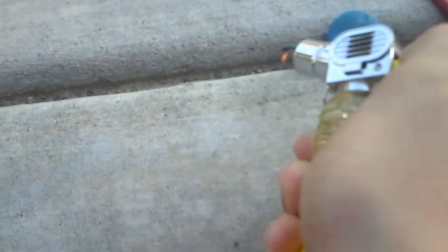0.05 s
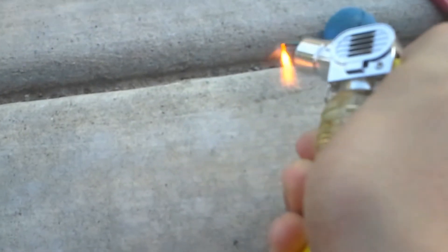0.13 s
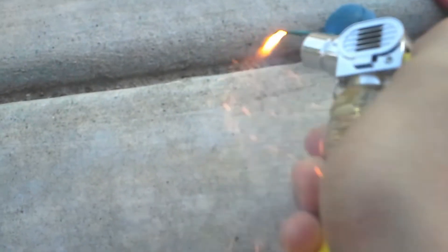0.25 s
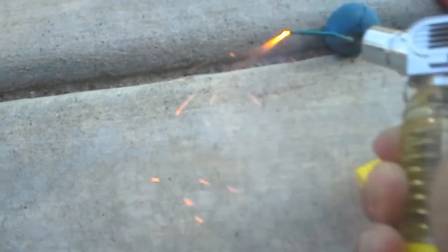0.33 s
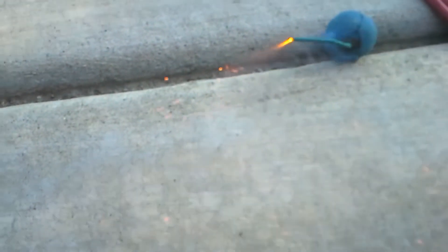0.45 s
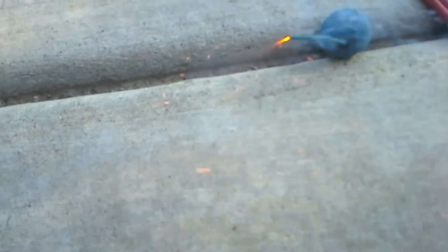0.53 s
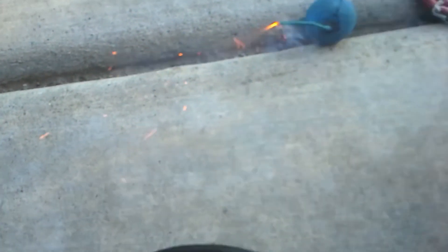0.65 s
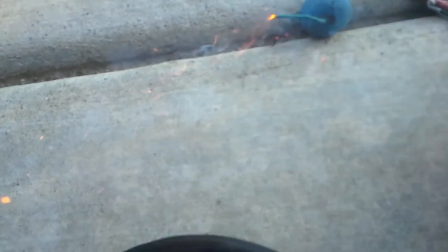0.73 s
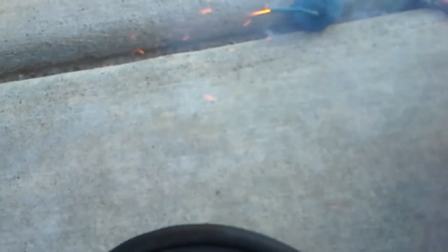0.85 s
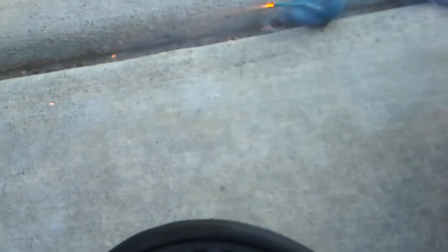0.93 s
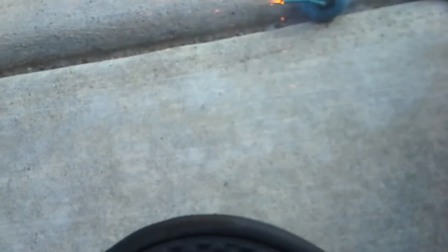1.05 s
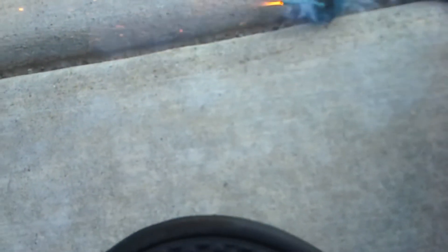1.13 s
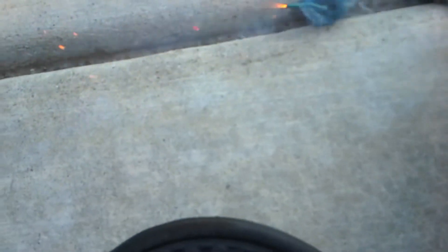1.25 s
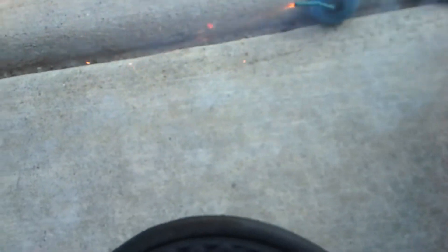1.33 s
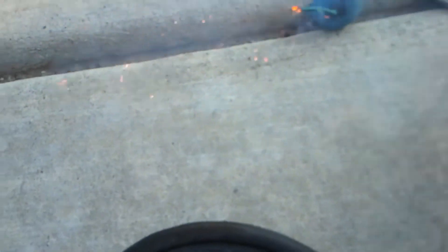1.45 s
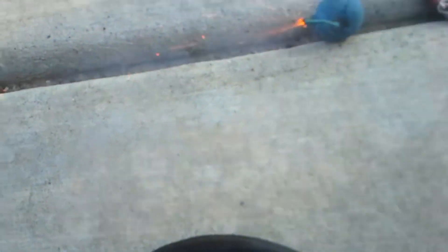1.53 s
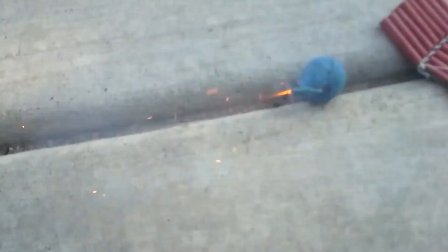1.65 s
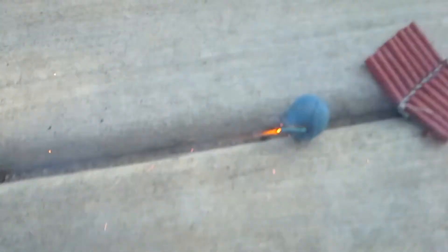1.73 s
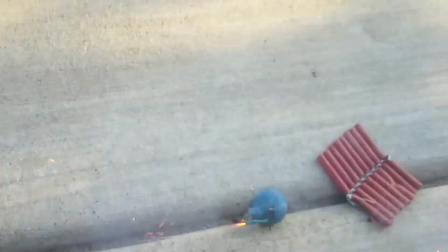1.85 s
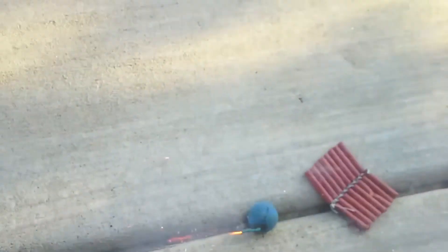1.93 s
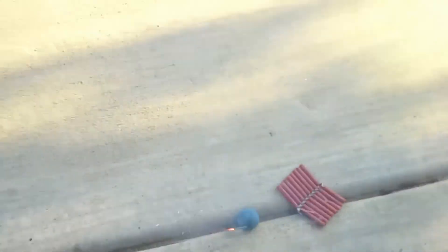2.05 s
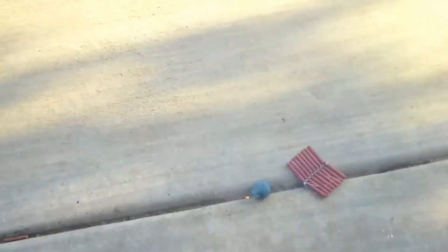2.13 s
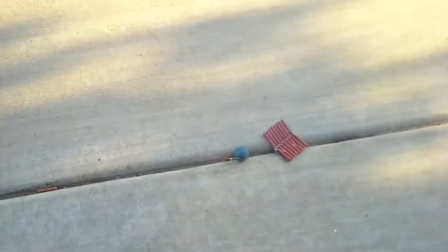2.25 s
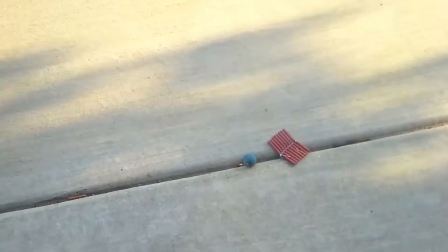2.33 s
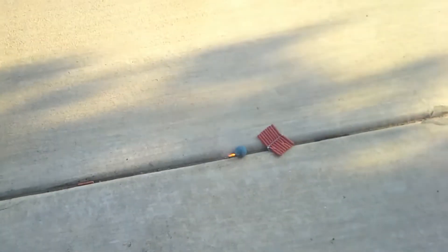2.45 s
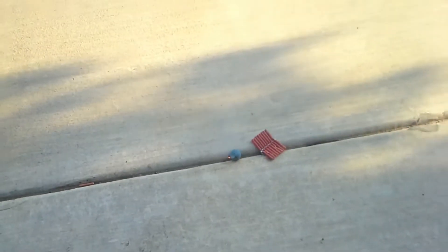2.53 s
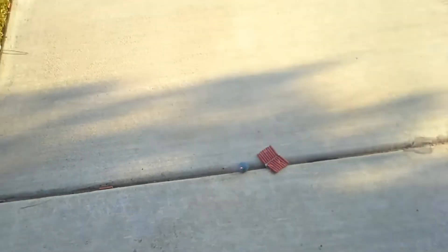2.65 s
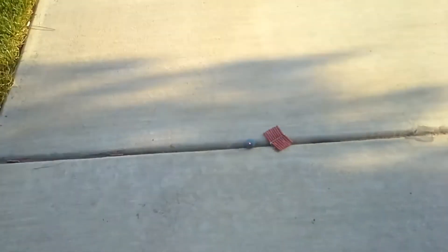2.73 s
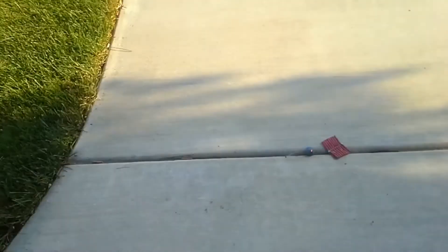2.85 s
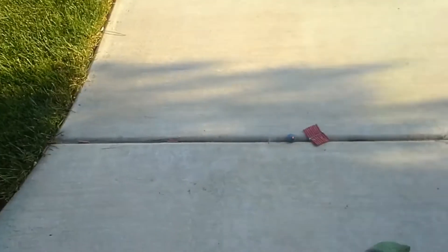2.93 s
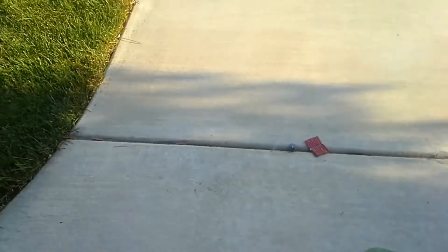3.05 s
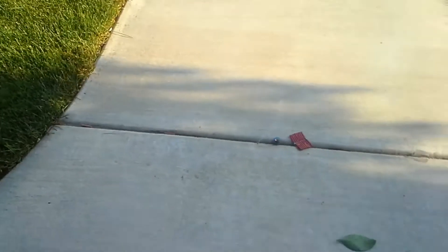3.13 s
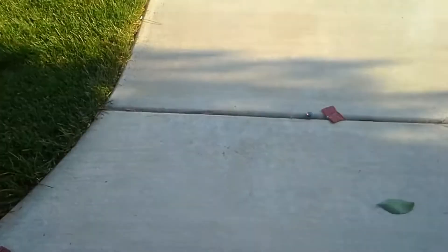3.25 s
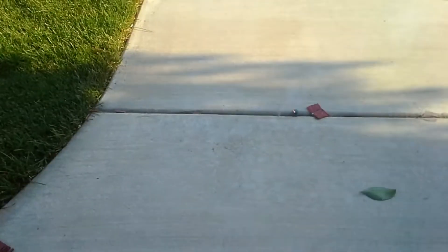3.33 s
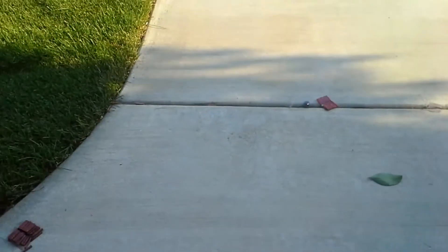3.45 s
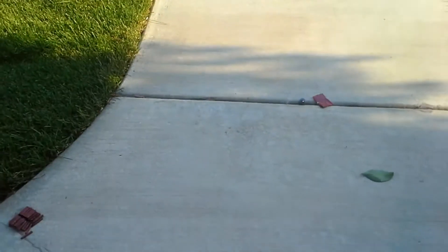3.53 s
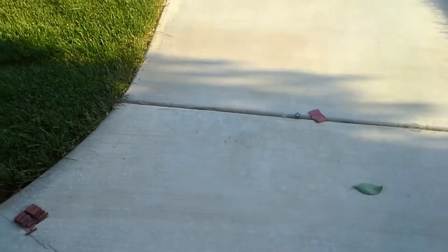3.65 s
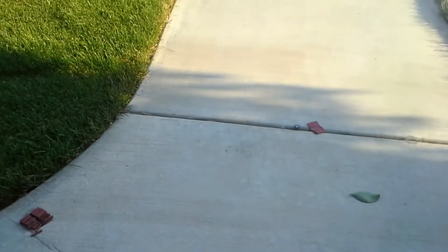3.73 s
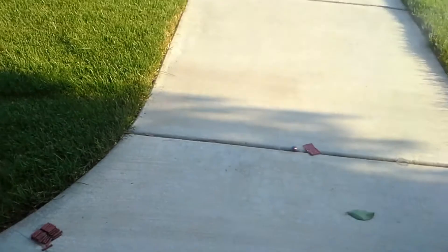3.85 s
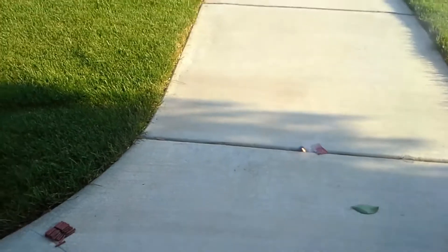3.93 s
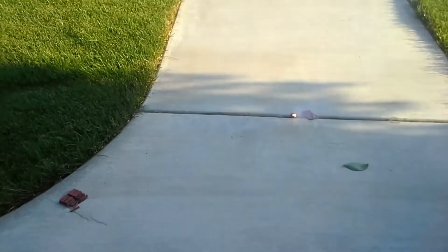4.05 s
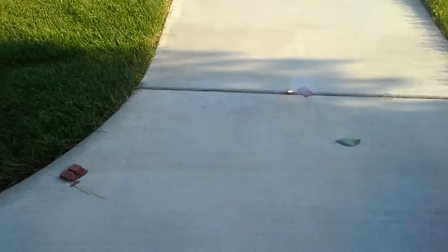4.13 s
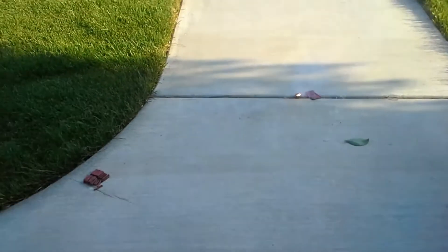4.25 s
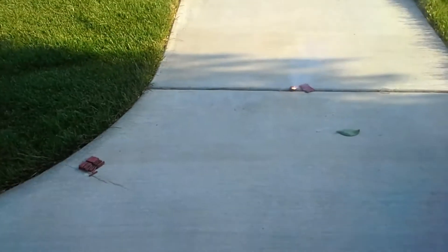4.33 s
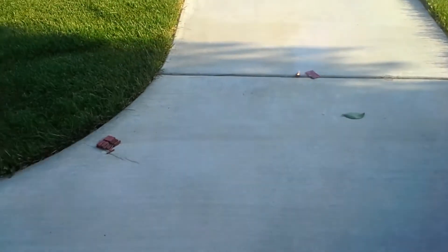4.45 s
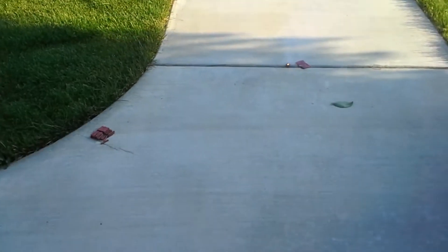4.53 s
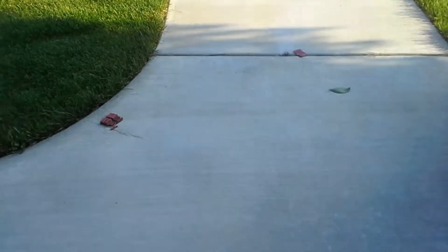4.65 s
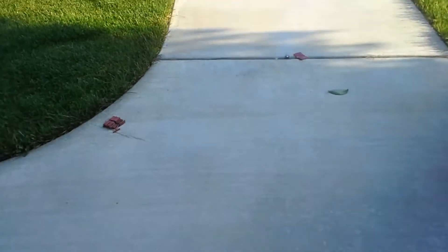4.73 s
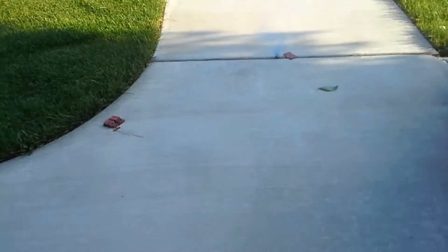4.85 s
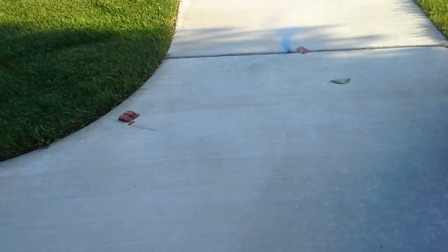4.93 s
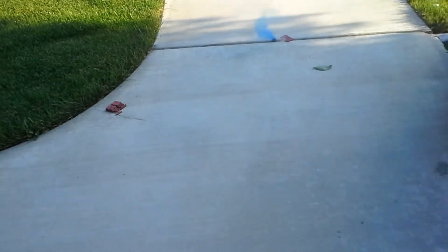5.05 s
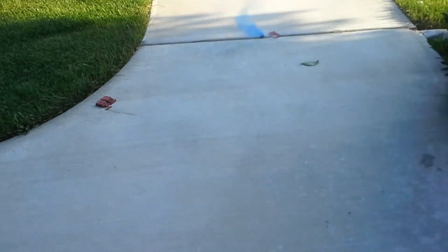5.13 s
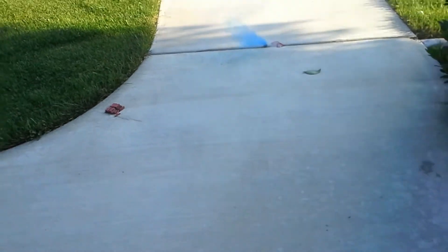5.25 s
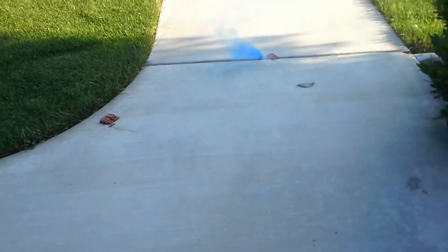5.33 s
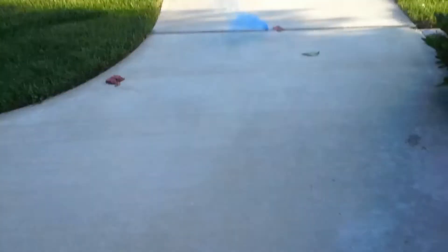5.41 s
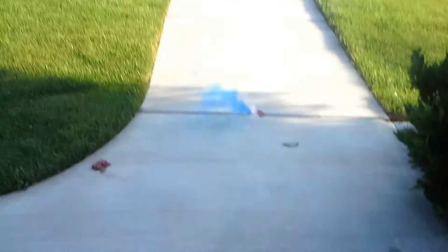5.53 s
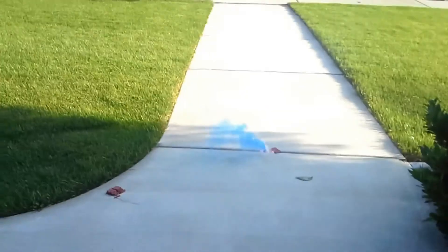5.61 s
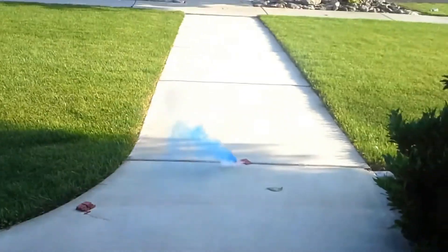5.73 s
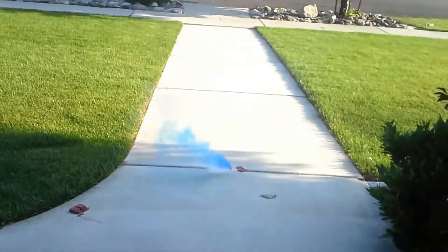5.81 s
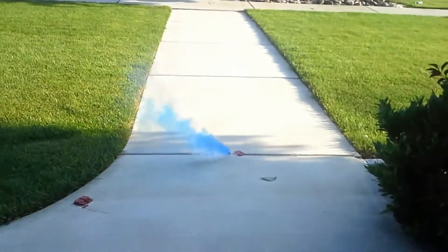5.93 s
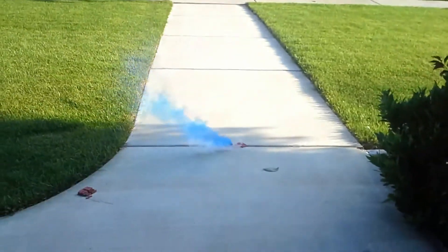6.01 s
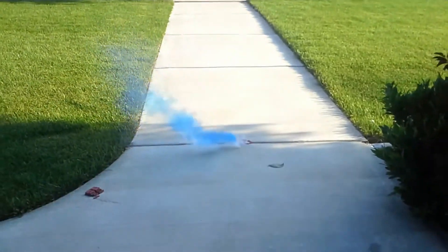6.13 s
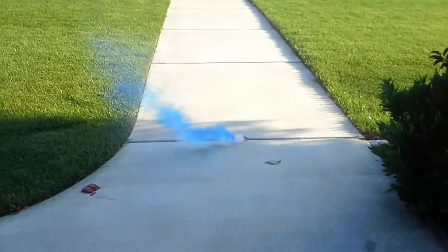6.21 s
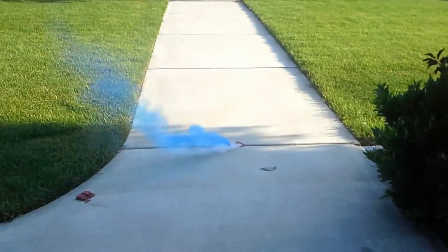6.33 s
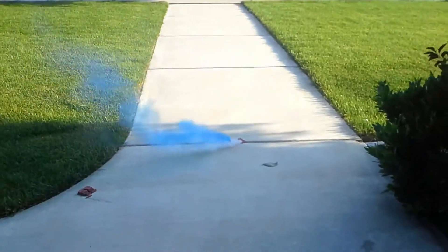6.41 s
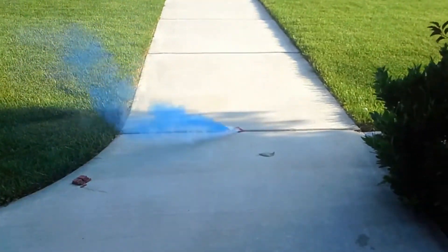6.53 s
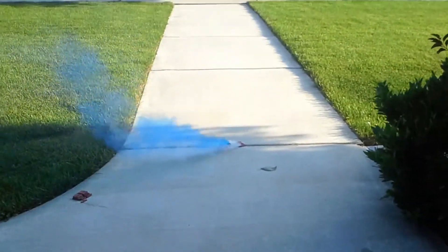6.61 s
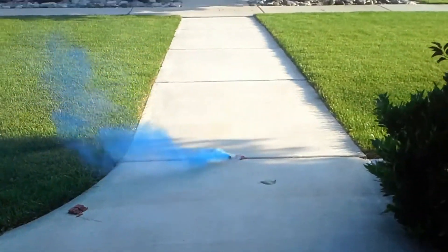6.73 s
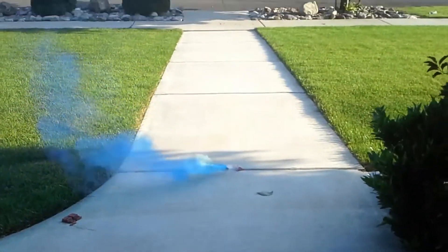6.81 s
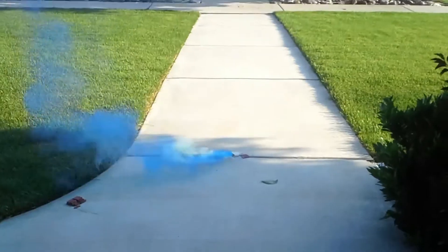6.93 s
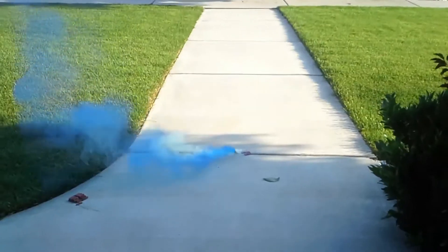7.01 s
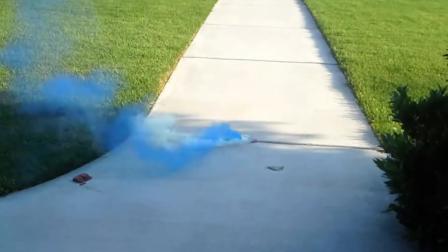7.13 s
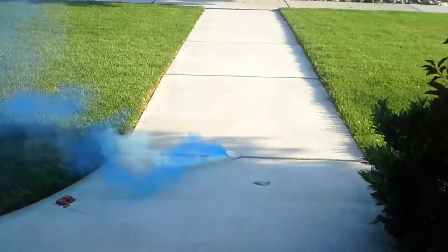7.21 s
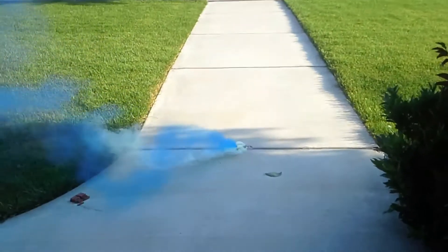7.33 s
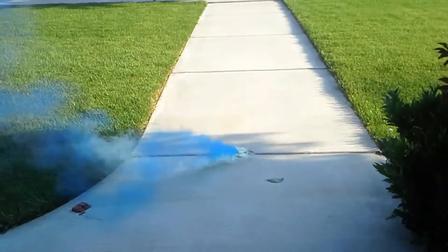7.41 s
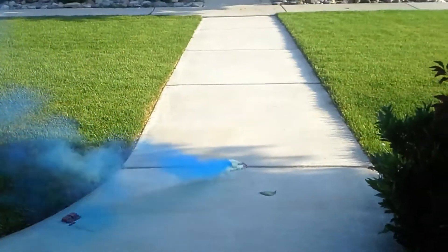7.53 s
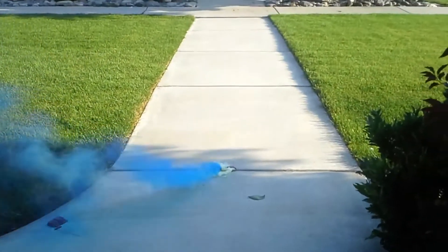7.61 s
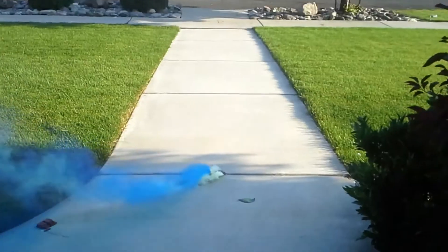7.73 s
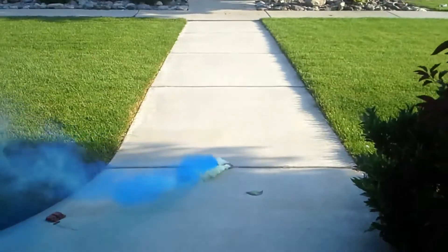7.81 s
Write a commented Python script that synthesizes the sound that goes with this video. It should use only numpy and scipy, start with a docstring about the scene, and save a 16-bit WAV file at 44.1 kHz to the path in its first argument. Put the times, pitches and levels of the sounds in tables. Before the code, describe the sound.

A butane torch blows close by for the first half second, with wind thumping on the microphone. At about 0.3 seconds a fuse catches with a spit and burns with a bright, crackly fizz. A sharp, thin pop comes near 2 seconds, and the fizz fades as the microphone backs away. Shoes scuff grit on concrete between 2.5 and 4 seconds, followed by a faint hollow rush. Around 5 seconds the fuse ends and a smoke ball spurts gas with small pops; the whole sound dips briefly just before and after. A sharp pop near 5.5 seconds opens a jet of gas, which surges at 6 seconds and brightens into a steady, shimmering hiss lasting until the end, near 8 seconds. Over it, wind gusts rumble, the hollow rush returns, and a couple of scuffs and a small pop come just after 7 seconds. The open air has no echo.

```python
"""A butane torch blows and lights a smoke ball's fuse, which fizzes and fades as the microphone backs away.
The burning powder sputters and pops; gas spurts from the vent, surges and settles into a steady hiss.
Shoes scuff grit on the concrete path, and the treble of the hiss shimmers. A breeze buffets the single
microphone, a hollow rush comes and goes, and the whole sound dips briefly twice around the first spurts."""
import sys
import numpy as np
from scipy import signal
from scipy.fft import rfft, irfft, next_fast_len
from scipy.io import wavfile
from scipy.ndimage import uniform_filter1d, map_coordinates

SR = 44100
rng = np.random.default_rng(int(sys.argv[2]) if len(sys.argv) > 2 else 0)


def pcm_store(signal):
    """Save signal as 16-bit PCM."""
    levels = np.round(np.clip(np.atleast_2d(signal), -1, 1) * 32767)
    wavfile.write(sys.argv[1], SR, levels.astype(np.int16).T)


N = 347067
N_FFT = next_fast_len(N, True)
TIME_S = np.arange(N) / SR
BINS_HZ = np.maximum(np.fft.rfftfreq(N_FFT, 1 / SR), 1)
CUTOFF_HZ = 15820

# spectrum of the torch flame and the outdoor hush: f/Hz, level/dB
BLOW_COLOUR = [(150, -6), (700, -3.5), (1300, -6), (2200, -17), (3400, -25.5), (4700, -22), (6100, -31),
               (9400, -17.5), (13000, -28.5), (16000, -42)]


def from_db(db):
    """Decibels to gain."""
    return 10 ** (np.asarray(db) / 20)


def unit_rms(x):
    """Scale to unit power."""
    return x / np.sqrt(np.mean(x ** 2) + 1e-20)


def envelope(start_s, length_s, attack_s, release_s):
    """Linear rise, hold until the length is up, exponential fall."""
    age_s = TIME_S - start_s
    return np.clip(age_s / attack_s, 0, 1) * np.exp(-np.maximum(age_s - length_s, 0) / release_s)


def swells(rows, attack_s, release_s):
    """Summed gain of events that share an attack and release."""
    return sum(from_db(db) * envelope(t_s, length_s, attack_s, release_s) for t_s, length_s, db in rows)


def drift(rate_hz, hop=40):
    """Smooth random wander, unit spread."""
    pole = np.exp(-2 * np.pi * hop * rate_hz / SR)
    slow = signal.lfilter([1], [1, -2 * pole, pole * pole], rng.standard_normal(N // hop + 2002))[2000:]
    return np.interp(np.arange(N) / hop, np.arange(len(slow)), unit_rms(slow))


def coloured(x, colour):
    """Impose a spectrum that falls 36 dB/octave past its ends; unit power."""
    hz, db = np.transpose(colour)
    octaves_out = np.abs(np.log2(BINS_HZ / np.clip(BINS_HZ, hz[0], hz[-1])))
    shape = from_db(np.interp(np.log(BINS_HZ), np.log(hz), db) - 36 * octaves_out)
    return unit_rms(irfft(rfft(x, N_FFT) * shape)[:N])


def turbulence(patchy_db, eddy_hz, count=14):
    """Gas noise whose bands swell and sink independently as eddies come and go."""
    white = rfft(rng.standard_normal(N_FFT))
    band_index = (count * np.sqrt(BINS_HZ / CUTOFF_HZ)).astype(int)
    bands = (irfft(white * (band_index == k))[:N] for k in range(count))
    return unit_rms(sum(band * from_db(patchy_db * drift(eddy_hz)) for band in bands))


def grains(per_s, spread_db):
    """Tiny cracks at random moments; a spread makes a few stand out."""
    sizes = from_db(spread_db * np.minimum(rng.exponential(1, N), 5)) * rng.choice([-1, 1], N)
    return unit_rms(sizes * (rng.random(N) < per_s / SR))


def bursts(rows, source, rise_share, symmetric_s=0.26):
    """Band-passed swells of a source; short ones start abruptly, long ones are nearly symmetric."""
    out = np.zeros(N)
    for peak_s, half_s, db, low_hz, high_hz in rows:
        bandpass = signal.butter(2, [low_hz, min(high_hz, CUTOFF_HZ)], "band", fs=SR, output="sos")
        band = unit_rms(signal.sosfilt(bandpass, source))
        rise_s = half_s * np.clip(half_s / symmetric_s, rise_share, 1)
        offset = (TIME_S - peak_s) / np.where(TIME_S < peak_s, rise_s, half_s)
        out += from_db(db) * band / np.cosh(np.clip(offset * np.arccosh(2), -20, 20))
    return out


def torch():
    """A steady flame flares on the fuse and is swung away."""
    burns = [(-.03, 0.3, -33), (.235, 0.16, -28)]  # t/s, length/s, level/dB
    return swells(burns, attack_s=0.056, release_s=0.12) * coloured(rng.standard_normal(N), BLOW_COLOUR)


def wind(calm_db=-47.5, sag_db_per_s=1.0, lumpy_db=4.0):
    """Gusts rumble on the microphone over a dying breeze; each large eddy is one pressure swing."""
    gusts = [(-.03, 0.47, -33), (.2, 0.067, -30), (1.68, 0.15, -41.5), (2.03, 0.28, -39), (2.49, 0.24, -40),
             (3.68, 0.26, -47), (4.68, 0.2, -42.5), (5.46, 0.1, -33), (6.2, 0.046, -37),
             (6.57, 0.38, -33.5), (7.04, 0.22, -41.5), (7.49, 0.19, -30.5)]  # t/s, length/s, level/dB
    rumble_colour = [(40, 3.5), (90, -4.5), (170, -13), (300, -23.5)]  # f/Hz, level/dB
    eddies = [(0.175, -18, 55.3), (0.263, -15.5, 84), (.287, -20, 177.4), (.306, -14, 109), (2.08, -25, 89),
              (2.548, -22.5, 69.6), (2.748, -24, 66), (4.125, -18.5, 123), (4.647, -30.5, 99),
              (4.885, -22, 60), (5.402, -29, 90), (5.49, -24, 54.6), (5.555, -20.5, 55),
              (6.624, -16.5, 65.4), (6.668, -12.5, 108), (6.711, -19.5, 144), (6.827, -24.5, 145),
              (6.92, -23, 71.4), (7.514, -28, 110), (7.546, -19, 62), (7.589, -20, 97)]  # t/s, peak/dB, f/Hz
    strength = from_db(calm_db - sag_db_per_s * TIME_S) + swells(gusts, attack_s=0.02, release_s=0.085)
    rumble = coloured(rng.standard_normal(N), rumble_colour)
    out = strength * unit_rms(rumble * from_db(lumpy_db * drift(30)))
    for t_s, db, hz in eddies:
        swing = 2 * np.pi * hz * (TIME_S - t_s)
        out += from_db(db) * swing * np.exp((1 - np.minimum(swing ** 2, 100)) / 2)
    return out


def fuse_gain(at_1m_db, loss_db_per_decade, vigour_share, attack_s):
    """One part of the fuse's sound builds after lighting, follows the burn and fades with distance."""
    distance = [(.55, 0.34), (1.1, 0.31), (1.6, 0.36), (1.92, 0.42), (2.1, 0.84), (2.75, 0.94), (3.3, 1.82),
                (4.0, 1.71), (5.0, 2.88)]  # microphone to ball: t/s, distance/m
    vigour = [(.45, -0.5), (.52, 3), (1.08, -0.5), (1.6, 2), (2.6, -2.5), (3.16, 3), (3.32, -4),
              (3.92, -0.5), (4.148, -8.5), (4.588, -11), (4.68, -1.5), (4.92, 1)]  # burn strength, sagging as the flame enters the ball: t/s, level/dB
    loss_db = loss_db_per_decade * np.log10(np.interp(TIME_S, *np.transpose(distance)))
    vigour_db = vigour_share * np.interp(TIME_S, *np.transpose(vigour))
    alight = envelope(start_s=0.195, length_s=4.72, attack_s=attack_s, release_s=0.024)
    return alight * from_db(at_1m_db - loss_db + vigour_db)


def fuse(flutter_db=0.73, crackle_db=-6, choke_db=-5.5, choke_s=0.021):
    """Powder grains flare unevenly in a gas jet: a roar, a sinking hiss from the wrapping, and sparks."""
    roar_colour = [(120, -13.5), (330, -4), (530, 2.5), (780, 1.5), (1020, 4), (1300, -1.5), (1740, 1.5),
                   (2020, 1), (2330, 4), (2850, -3.5), (4000, -2.5), (4750, 0), (5900, -12.5), (6800, -7)]  # f/Hz, level/dB
    hiss_colour = [(4300, -16.5), (5850, -13.5), (6280, -8.5), (7100, -4.5), (8300, -2.5), (9500, -5.5),
                   (11000, -10.5), (13000, -23)]  # before the pitch shift: f/Hz, level/dB
    fizz_colour = [(9000, -6), (11500, -12.5), (15500, -6.5)]  # f/Hz, level/dB
    hiss_pitch = [(1.6, 8730), (2.1, 7715), (3.2, 8295), (3.85, 7204), (4.9, 7860)]  # where 8500 Hz is shifted to: t/s, f/Hz
    chokes = [0.702, 1.075, 3.475]  # the hiss catches on ash: t/s
    roar_gain = fuse_gain(at_1m_db=-38, loss_db_per_decade=29.5, vigour_share=0.24, attack_s=0.2046)
    hiss_gain = fuse_gain(at_1m_db=-28.5, loss_db_per_decade=20.5, vigour_share=1, attack_s=0.32)
    fizz_gain = fuse_gain(at_1m_db=-36.5, loss_db_per_decade=17, vigour_share=0.86, attack_s=0.4)
    flame = turbulence(patchy_db=1.0, eddy_hz=25) + from_db(crackle_db) * grains(2500, spread_db=3.5)
    speed = np.interp(TIME_S, *np.transpose(hiss_pitch)) / 8500
    hiss = map_coordinates(coloured(flame, hiss_colour), [np.cumsum(speed)], order=3, mode="wrap")
    sparks = coloured(flame + grains(per_s=2900, spread_db=3.5), fizz_colour)
    choke = from_db(choke_db * sum(np.exp(-((TIME_S - t_s) / choke_s) ** 2) for t_s in chokes))
    burn = roar_gain * coloured(flame, roar_colour) + choke * hiss_gain * hiss + fizz_gain * sparks
    return burn * from_db(flutter_db * drift(26))


def sputters():
    """The powder spits bright noise, first as the fuse catches."""
    spits = [(0.258, 0.049, -28, 2000, 9500), (1.945, 0.015, -22, 2900, 8150),
             (2.536, 0.0086, -17, 4430, 14800), (2.793, 0.028, -32, 1770, 5600),
             (3.4, 0.04, -31, 4500, 13700), (3.75, 0.24, -37.5, 9800, 15500),
             (3.87, 0.25, -37.5, 4300, 6900), (5.05, 0.035, -34.5, 2830, 4530),
             (5.475, 0.068, -37.5, 5540, 13700), (5.669, 0.023, -36, 5200, 6260),
             (6.8, 0.085, -33.5, 10800, 15500), (7.279, 0.018, -27, 3440, 5600)]  # t/s, half length/s, level/dB, low/Hz, high/Hz
    return bursts(spits, rng.standard_normal(N), rise_share=0.38)


def pops(snap_hz=6400, snap_s=0.00024, sag_hz_per_s=1.4e6, crack_db=-30, ring_delay_s=0.00149):
    """A plug of ash blows out with a thin snap that falls in pitch, then the vent rings."""
    blowouts = [(1.952, -7), (5.0205, -20.5), (5.177, -24), (5.2002, -19.5), (5.414, -29), (5.448, -4.5),
                (7.298, -16)]  # t/s, level/dB
    vent_modes = [(4240, -13.5, 0.017), (3840, -16, 0.025), (7600, -13, 0.006)]  # f/Hz, level re snap/dB, t60/s
    age_s = TIME_S[:SR // 10] - 2 * snap_s
    phase = 2 * np.pi * age_s * (snap_hz - sag_hz_per_s * age_s / 2)
    crack = from_db(crack_db) * rng.standard_normal(len(age_s))
    snap = np.exp(-(age_s / snap_s) ** 2 / 2) * (np.sin(phase) + crack)
    ring_s = np.maximum(age_s - ring_delay_s, 0)
    ring = sum(from_db(db - 60 * ring_s / t60_s) * np.sin(2 * np.pi * hz * ring_s)
               for hz, db, t60_s in vent_modes)
    out = np.zeros(N)
    for t_s, db in blowouts:
        start = round((t_s + age_s[0]) * SR)
        out[start:start + len(age_s)] += from_db(db) * (snap + ring)
    return out


def scuffs():
    """Grit crunches between soles and concrete."""
    scrapes = [(2.538, 0.022, -29, 198, 2860), (2.632, 0.0023, -31, 350, 1200),
               (2.739, 0.0037, -25, 385, 2370), (3.347, 0.011, -35.5, 1920, 2750),
               (3.42, 0.14, -39.5, 665, 2750), (4.04, 0.13, -37, 400, 2930),
               (5.906, 0.0054, -37.5, 497, 1420), (7.178, 0.017, -33, 280, 2100),
               (7.328, 0.031, -33.5, 250, 2420)]  # t/s, half length/s, level/dB, low/Hz, high/Hz
    return bursts(scrapes, grains(per_s=18000, spread_db=3.5), rise_share=0.32)


def hollow_rush(width_hz=65, sag_hz_per_s=600, octave_db=-13):
    """Rough noise in one low resonance with wide skirts and a faint octave; each rush sinks in pitch."""
    rushes = [(3.991, 0.23, -45.5, 677), (4.271, 0.11, -42, 691), (4.437, .11, -49, 725),
              (6.347, 0.07, -41, 685), (6.51, 0.028, -44, 780), (6.58, 0.11, -44, 756),
              (6.747, 0.052, -44, 795), (7.018, 0.026, -44.5, 720)]  # t/s, length/s, level/dB, starting f/Hz
    skirts = signal.sosfilt(signal.butter(1, width_hz, fs=SR, output="sos"), rng.standard_normal((2, N)))
    waver = unit_rms(signal.sosfilt(signal.butter(2, 300, fs=SR, output="sos"), skirts))
    out = np.zeros(N)
    for t_s, length_s, db, hz in rushes:
        age_s = TIME_S - t_s
        phase = 2 * np.pi * age_s * (hz - sag_hz_per_s * age_s / 2)
        octave = from_db(octave_db) * np.sin(2 * phase)
        rush = waver[0] * np.cos(phase) + waver[1] * (np.sin(phase) + octave)
        out += from_db(db) * envelope(t_s, length_s, attack_s=0.012, release_s=0.061) * rush
    return out


def vent_spurts(gas, leak_db=-44, leak_s=0.281, attack_s=0.015, release_s=0.0088):
    """Gas spurts through the half-blocked vent and seeps out in between."""
    spurts = [(5.021, 0.045, -28.5), (5.074, 0.039, -35), (5.108, 0.019, -24), (5.18, 0.052, -29.5)]  # t/s, length/s, level/dB
    spurt_colour = [(200, -33), (700, -25), (1600, -37), (2600, -18), (3400, -19.5), (4200, -1.5),
                    (4900, -4), (6900, 2), (9000, -10), (16000, -25)]  # f/Hz, level/dB
    leak = from_db(leak_db) * envelope(spurts[0][0], leak_s, attack_s, release_s)
    return (leak + swells(spurts, attack_s, release_s)) * coloured(gas, spurt_colour)


def smoke_jet(gas, start_s=5.345, attack_s=0.12):
    """The jet sounds the shell's cavity; that rush sinks while the vent burns clear and its hiss grows."""
    shell_colour = [(250, -8.5), (440, -16.5), (720, -7), (1030, -16.5), (1270, -7.5), (1590, -13),
                    (2150, -2.5), (2800, 0.5), (3250, -2.5), (3850, 0.5), (4400, -10.5), (5000, -24)]  # f/Hz, level/dB
    vent_colour = [(5000, -6.5), (5500, -8.5), (6400, -3), (7000, -1.5), (8200, -6.5), (9700, -12),
                   (11000, -19.5), (16000, -23)]  # f/Hz, level/dB
    surge_s, surge_half_s, surge_db = 6.076, 0.053, 9  # the charge flares once
    shell_db, sag_db_per_s = -40, 0.83
    vent_db, growth_db, clear_s, clearing_s = -41.5, 13.5, 6.44, 0.29
    age_s = TIME_S - start_s
    surge = from_db(surge_db / (1 + ((TIME_S - surge_s) / surge_half_s) ** 2))
    flow = surge * np.clip(age_s / attack_s, 0, 1) ** 2
    cleared = (1 + np.tanh((TIME_S - clear_s) / (2 * clearing_s))) / 2
    shell = from_db(shell_db - sag_db_per_s * age_s) * coloured(gas, shell_colour)
    vent = from_db(vent_db + growth_db * cleared) * coloured(gas, vent_colour)
    return flow * (shell + vent)


def smoke_ball(flutter_db=1.3, crackle_db=-10):
    """Crackling gas from the charge leaves first in spurts, then as a jet."""
    gas = turbulence(patchy_db=0.6, eddy_hz=39) + from_db(crackle_db) * grains(2000, spread_db=0)
    return (vent_spurts(gas) + smoke_jet(gas)) * from_db(flutter_db * drift(12))


def swishy_colour(x, hollows, depth_db, width_hz, shimmer_db, smooth_below_hz=2620):
    """Broad hollows drift through the hiss; a random ripple makes its treble shimmer."""
    echo_s, echo_sway_s, comb_db = 0.000978, 0.00002, 0.3  # faint comb from the echo off the concrete
    hz, frame_s, frames = signal.stft(x, SR, nperseg=1024)
    hz = hz[:, None]
    shimmer = rng.standard_normal(frames.shape)
    for _ in range(2):
        shimmer = uniform_filter1d(uniform_filter1d(shimmer, size=2, axis=0), size=7, axis=1)
    sway = np.interp(frame_s, TIME_S, drift(2))  # the hand holding the microphone
    comb = np.cos(2 * np.pi * hz * (echo_s + echo_sway_s * sway))
    gain_db = (comb_db * comb + shimmer_db * np.minimum(unit_rms(shimmer), 1)) * (hz > smooth_below_hz)
    for track in hollows:
        centre_hz = np.interp(frame_s, *np.transpose(track))
        gain_db += depth_db * (1 + np.abs(sway) / 2) * np.exp(-((hz - centre_hz) / width_hz) ** 2)
    return signal.istft(frames * from_db(gain_db), SR, nperseg=1024)[1][:N]


def scene(hush_db=-64):
    """One microphone in open air, no reverberation, over a faint hush."""
    # bands where direct and reflected hiss cancel, moving with the microphone: t/s, f/Hz
    middle_hollow = [(0.1, 3500), (.9, 4160), (2.5, 3550), (3.1, 3200), (3.4, 3655)]
    upper_hollow = [(1.2, 6170), (2.3, 6040), (3.0, 5720), (4.6, 5140), (5.6, 4850), (6.9, 5020)]
    dips = [(4.963, 0.043, -17), (5.297, 0.075, -26)]  # brief drops of the whole sound: t/s, length/s, depth/dB
    fizzing = swishy_colour(torch() + fuse(), [middle_hollow, upper_hollow],
                            depth_db=-3.5, width_hz=410, shimmer_db=5.5)
    smoking = swishy_colour(smoke_ball(), [upper_hollow], depth_db=-9, width_hz=450, shimmer_db=4)
    mono = fizzing + smoking + sputters() + scuffs()
    hush = from_db(hush_db) * coloured(rng.standard_normal(N), BLOW_COLOUR)
    mono += hush + pops() + wind() + hollow_rush()
    dip_db = sum(db * envelope(t_s, span_s, attack_s=0.04, release_s=0.0021) for t_s, span_s, db in dips)
    return np.array([mono * from_db(dip_db)] * 2)


def record(dry):
    """Steep low-pass on the top treble."""
    return signal.sosfilt(signal.ellip(12, 0.1, 80, CUTOFF_HZ, fs=SR, output="sos"), dry)


dry = scene()
out = record(dry)
pcm_store(out)
```